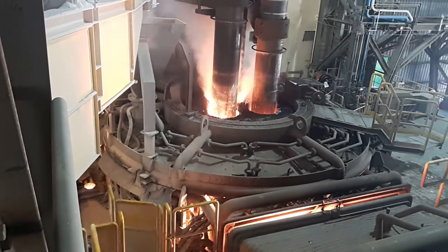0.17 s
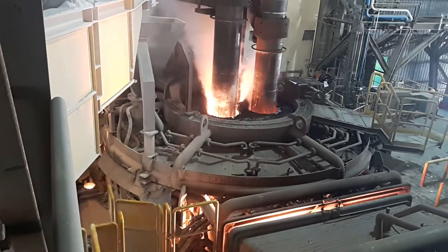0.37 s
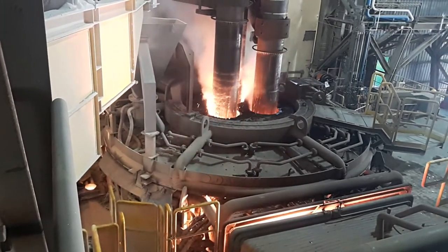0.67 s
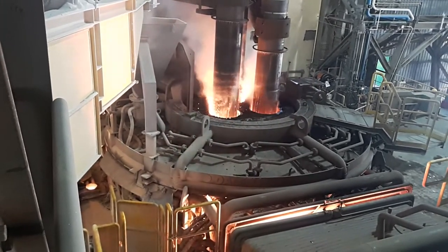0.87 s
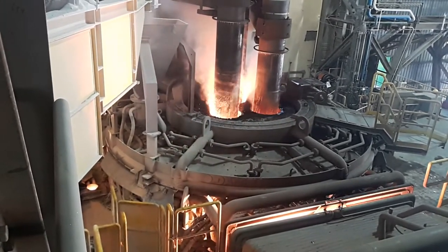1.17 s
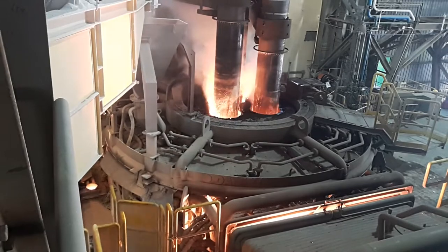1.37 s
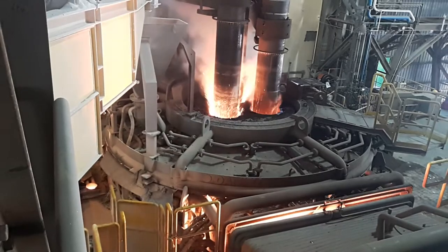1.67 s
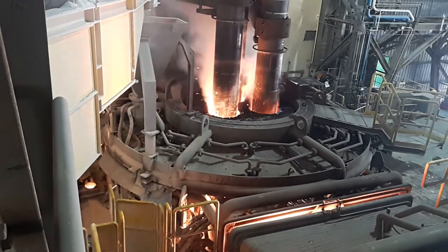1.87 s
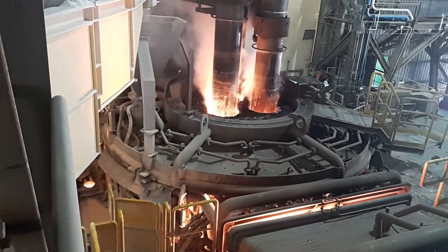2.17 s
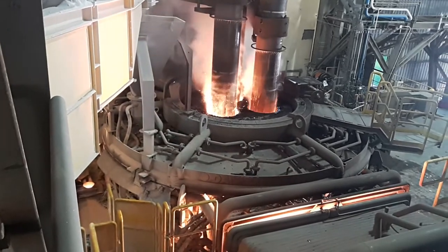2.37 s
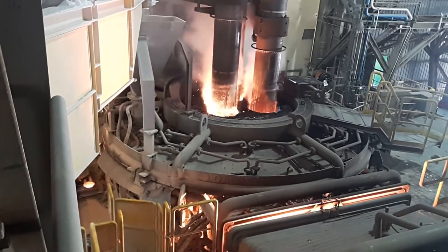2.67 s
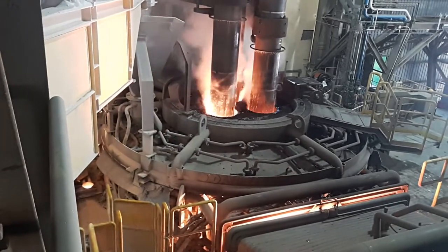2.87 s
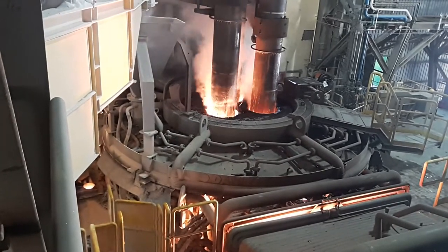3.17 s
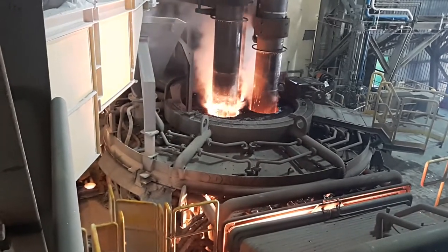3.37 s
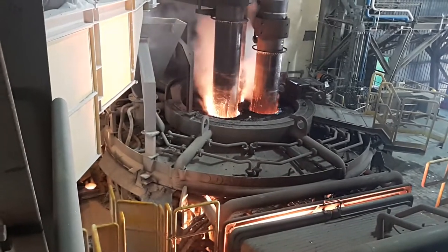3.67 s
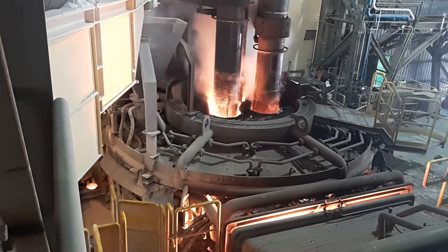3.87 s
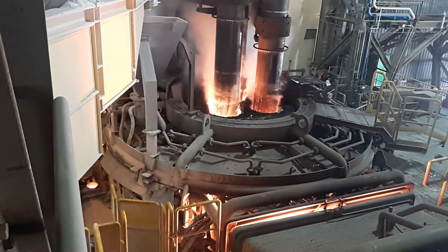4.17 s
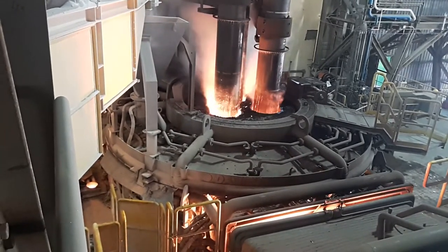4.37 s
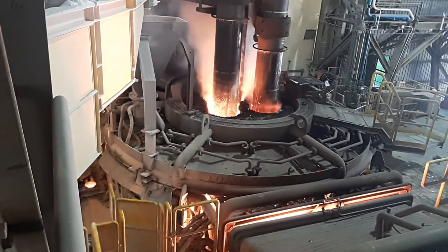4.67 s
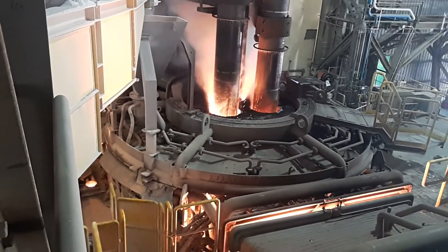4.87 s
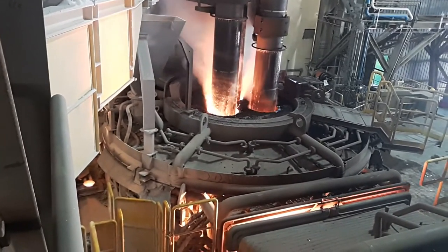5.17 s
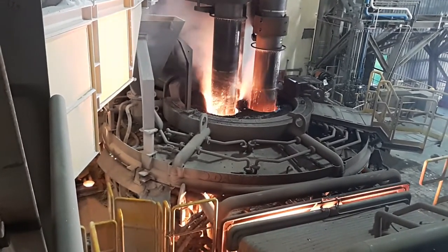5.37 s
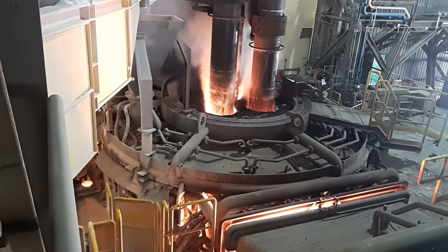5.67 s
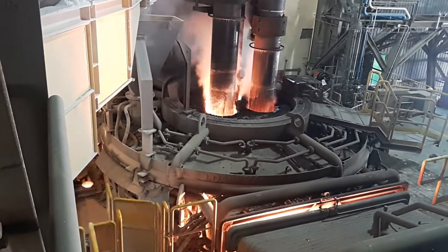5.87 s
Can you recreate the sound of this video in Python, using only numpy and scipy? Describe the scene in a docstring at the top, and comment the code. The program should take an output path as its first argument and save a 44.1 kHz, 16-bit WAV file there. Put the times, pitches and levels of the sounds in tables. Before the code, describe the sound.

An electric arc furnace runs without pause in a large steel plant. Its loud, low hum wavers as the overtones swell and fade, mixed with a rough roar and dense crackling of sparks. Now and then a flare spits at the electrodes or a heavy arc gives a short muffled bark inside the shell. Machinery whines very faintly. The microphone is on a gallery above the furnace roof.

```python
"""An electric arc furnace melts steel in a large plant hall, heard from a gallery above its roof.
The arcs restrike twice per mains cycle: a loud hum whose harmonics swell and fade as the arcs wander.
Uneven puffs add a rough roar, sparks crackle without pause, and plant machinery whines faintly.
Now and then a flare spits at the electrode ports or a heavy strike barks inside the shell."""
import sys
import numpy as np
from scipy import signal
from scipy.fft import rfft, irfft, next_fast_len
from scipy.io import wavfile
from scipy.ndimage import uniform_filter1d, minimum_filter1d, map_coordinates

SR = 44100
rng = np.random.default_rng(int(sys.argv[2]) if len(sys.argv) > 2 else 0)


def materialize(psi):
    """Save the field psi as 16-bit PCM at rate SR to the path in sys.argv[1].

    A 1-D psi becomes a single channel; in a 2-D psi each row is a channel.
    """
    bounded = np.clip(np.atleast_2d(psi).T, -1, 1)
    quanta = np.round(bounded * 32767).astype(np.int16)
    wavfile.write(sys.argv[1], SR, quanta)


N = 264776
TIME_S = np.arange(N) / SR
RESTRIKE_HZ = 99.8


def amp(db):
    """Decibels to gain."""
    return 10 ** (np.asarray(db) / 20)


def unit_rms(x):
    """Scale to rms 1."""
    return x / np.sqrt(np.mean(np.abs(x) ** 2) + 1e-20)


def at_hz(points, hz):
    """Interpolate (freq_hz, value) rows on a log axis."""
    freqs_hz, values = np.transpose(points)
    return np.interp(np.log(hz + 1), np.log(freqs_hz + 1), values)


def curve(points):
    """Interpolate (time_s, value) rows per sample."""
    return np.interp(TIME_S, *np.transpose(points))


def wobble(knots_per_s):
    """Smooth random curve, rms near 1."""
    return map_coordinates(rng.standard_normal(2048), [TIME_S * knots_per_s], mode="wrap")


def filtered(x, response):
    """Apply the gain response(hz)."""
    size = next_fast_len(N + SR // 2)
    return irfft(rfft(x, size) * response(np.fft.rfftfreq(size, 1 / SR)), size)[..., :N]


def pan(db):
    """Stereo gains for a left-over-right level."""
    return amp(np.array([np.atleast_1d(db), -np.atleast_1d(db)]) / 2)


def disturbance(events, half_width_s, full_db):
    """How far events unsettle the arcs, 0 to 1; saturates at full_db."""
    bumps = (amp(db - full_db) ** 2 * np.exp(-((TIME_S - start_s) / half_width_s) ** 2)
             for start_s, db, *_ in events)
    return np.minimum(1, sum(bumps))


# left-right likeness: freq_hz, correlation
COHERENCE = [(30, .85), (100, 0.7), (200, 0.9), (400, 0.3), (650, 0.77), (1000, 0.38), (2000, 0.072),
             (15000, .05)]
# left over right: freq_hz, pan_db
BALANCE = [(60, 12), (200, -4), (330, 1.5), (500, 0), (770, 4), (1170, -1.5), (1800, 5.5), (2800, 3),
           (4200, 3), (6400, 1.5), (9000, -3), (12000, 3)]


def spread(noise_pair, spectrum):
    """Colour two independent noises and blend to stereo: bass alike, treble diffuse."""
    def mid_side_gains(hz):
        angle = np.arccos(at_hz(COHERENCE, hz)) / 2
        return amp(at_hz(spectrum, hz)) * [np.cos(angle), np.sin(angle)]

    mid, side = filtered(noise_pair, mid_side_gains)
    stereo = np.array([mid + side, mid - side]) / np.std(mid)
    return filtered(stereo, lambda hz: pan(at_hz(BALANCE, hz)))


def hall_noise(power, near_t60_s, tail_t60_s=0.4, tail_db=7.5):
    """Noise pair carrying each burst of power: scatter off nearby steel, then the hall's tail."""
    t = np.arange(SR) / SR
    near, tail = amp(-120 * t / near_t60_s), amp(-120 * t / tail_t60_s)
    response = near / near.sum() + amp(2 * tail_db) * tail / tail.sum()
    arriving = signal.fftconvolve(np.pad(power, (SR, 0), mode="wrap"), response)[SR:SR + N]
    return np.sqrt(np.abs(arriving)) * rng.standard_normal((2, N))


# hum harmonics 1 to 4, before trim: time_s, level_db
HARMONIC_1 = [(0.0, -16), (0.56, -17), (0.68, -14.5), (0.76, -17), (1.86, -15.5), (1.92, -20.5),
              (2.14, -13), (2.38, -20.5), (2.5, -14), (2.96, -18.5), (3.08, -12.5), (3.18, -17.5),
              (3.66, -14.5), (3.74, -18.5), (3.9, -14), (5.14, -18.5), (5.28, -14.5), (5.68, -17),
              (5.84, -18.5), (6.0, -19.0)]
HARMONIC_2 = [(0.0, -25), (0.06, -18), (0.56, -29), (0.7, -14.5), (0.78, -26.5), (0.94, -18.5),
              (1.22, -30.5), (1.32, -15), (2.04, -24.5), (2.36, -17), (2.46, -26), (2.52, -16.5),
              (2.84, -14.5), (2.94, -26), (3.04, -19.0), (3.6, -18), (3.68, -32), (4.24, -18),
              (4.62, -27.5), (4.88, -13), (5.12, -27.5), (6.0, -21.5)]
HARMONIC_3 = [(0.0, -18), (0.28, -18.0), (0.34, -27.5), (0.48, -11.5), (0.68, -20.5), (0.86, -15),
              (1.84, -19.0), (1.96, -14.5), (2.42, -18.5), (2.5, -32.5), (2.76, -13), (3.16, -22),
              (3.22, -13.5), (3.46, -23.5), (3.54, -13.5), (3.68, -22.5), (3.82, -13), (3.92, -18.5),
              (4.06, -12.5), (4.28, -17.5), (4.48, -13), (4.88, -19.5), (4.94, -15), (5.32, -18.5),
              (5.38, -28.0), (5.64, -13.0), (5.84, -20), (6.0, -12.5)]
HARMONIC_4 = [(0.0, -24.5), (0.078, -21), (0.14, -27), (0.38, -15), (0.5, -30.5), (0.6, -17), (1.04, -31),
              (1.12, -20.5), (1.4, -32), (1.64, -18), (1.98, -31.5), (2.16, -19.5), (2.3, -34),
              (2.42, -21.5), (3.02, -18.5), (3.18, -24.5), (3.3, -14), (3.5, -27.5), (3.64, -16.5),
              (3.84, -26), (3.92, -20.5), (4.56, -27.5), (4.68, -15.5), (4.92, -25), (5.36, -19),
              (5.58, -21), (5.86, -16.5), (6.0, -26.5)]
# harmonics 1 to 5: multiple, trim_db, swell_db, wander_rad, flutter_share, pan_db
LOW_HARMONICS = [(1, 0.5, 1.5, 0.077, 0.021, 2.1), (2, -0.5, 2, 2.1, 0.45, 0.2),
                 (3, 0, 1.47, .6, 0.22, 5.5), (4, 0.7, 1.5, 0.89, 0.27, 0.5),
                 (5, -1, 3.5, 1.44, 0.34, -1.5)]
# faint, blurred harmonics: multiple, level_db, flutter_per_s
HIGH_HARMONICS = [(6, -33.5, 20), (7, -38.5, 36), (8, -41.5, 30)]


def hum(fifth_db=-28.5, swells_per_s=11):
    """Restrike harmonics drift as the arcs wander; flares sap 2 to 5, blasts pump 2 and 4."""
    def flutter(per_s):
        return unit_rms(wobble(per_s) + 1j * wobble(per_s))

    phase = 2 * np.pi * RESTRIKE_HZ * TIME_S
    sag_db = 4 * disturbance(PORT_FLARES, half_width_s=0.027, full_db=-17.5)
    pump_db = 2 * disturbance(HEAVY_STRIKES, half_width_s=0.034, full_db=-8.5)
    levels_db = [curve(HARMONIC_1),
                 curve(HARMONIC_2) + pump_db - sag_db,
                 curve(HARMONIC_3) - sag_db,
                 curve(HARMONIC_4) + pump_db - sag_db,
                 fifth_db - sag_db]
    out = np.zeros((2, N))
    for level_db, (k, trim_db, swell_db, wander_rad, share, pan_db) in zip(levels_db, LOW_HARMONICS):
        hall_rad = rng.uniform(0, 2 * np.pi)
        tone = np.exp(1j * (k * phase + hall_rad + wander_rad * wobble(4)))
        # the hall adds a little flutter of its own on each side
        waver = 1 + share * (flutter(32) + 0.35 * np.array([flutter(37), flutter(18)]))
        swell = 1 + (amp(swell_db) - 1) * np.tanh(wobble(swells_per_s))
        out += amp(level_db + trim_db) * pan(pan_db) * unit_rms((swell * waver * tone).real)
    for k, level_db, per_s in HIGH_HARMONICS:
        waver = flutter(per_s) + 0.16 * np.array([flutter(per_s), flutter(per_s)])
        out += amp(level_db) * unit_rms((waver * np.exp(1j * k * phase)).real)
    return out


# how hard the arcs blow: time_s, relative_db
ROAR_LEVEL = [(0.0, -26), (0.06, -26.0), (0.74, -29), (1.44, -28), (2.82, -28.5), (3.0, -32), (3.34, -25.5),
              (3.52, -27.5), (4.62, -28.5), (6.0, -29)]
# puffs through the furnace shell: freq_hz, gain_db
ROAR_SPECTRUM = [(20, -28.5), (45, -17), (68, -9), (100, -2.5), (165, 3.5), (250, 1.5), (350, 2), (550, -1),
                 (740, -7.5), (980, -5), (1300, -16), (1700, -19), (4000, -47), (10000, -96)]


def roar(gain_db=7.5, surge_db=1, surges_per_s=16, scatter_db=0.5, jitter_rad=2.1):
    """Each restrike blows one ragged puff of its own strength and timing into the shell."""
    level_db = curve(ROAR_LEVEL) + gain_db + surge_db * wobble(surges_per_s)
    phase = 2 * np.pi * RESTRIKE_HZ * TIME_S + jitter_rad * wobble(45)
    puffs = np.exp(np.cos(phase)) * amp(scatter_db * wobble(RESTRIKE_HZ))
    return amp(level_db) * spread(hall_noise(puffs ** 2, near_t60_s=0.008), ROAR_SPECTRUM)


# spark activity: time_s, relative_db
SPARK_LEVEL = [(0.04, -35), (0.3, -36.5), (2.38, -35), (2.77, -35), (3.34, -34.5), (3.87, -36.5),
               (4.27, -35), (4.85, -37), (5.4, -35), (5.8, -35)]
# spark colour: freq_hz, gain_db
SPARK_SPECTRUM = [(700, -25.5), (1200, -4), (1700, -9.5), (2600, -9), (3500, -14.5), (4700, -16),
                  (6000, -22.5), (7500, -23), (8500, -20.5), (9300, -23.5), (10300, -31.5), (13500, -36.5),
                  (15500, -34.5)]


def crackle(sparks_per_s=900, scatter_db=4.5, split_hz=4500, coarse_db=2, fine_db=1.03):
    """Dense sparks of uneven size, smeared by the hall; the finest fizz independently."""
    def shower():
        sizes = amp(scatter_db * np.clip(rng.standard_normal(N), -2.5, 2.5))
        sparks = sizes * (rng.random(N) < sparks_per_s / SR)
        return spread(hall_noise(sparks ** 2, near_t60_s=0.043), SPARK_SPECTRUM)

    def low_share(hz):
        return 1 / (1 + (hz / split_hz) ** 6)

    coarse = filtered(shower(), lambda hz: np.sqrt(low_share(hz)))
    fine = filtered(shower(), lambda hz: np.sqrt(1 - low_share(hz)))
    return amp(curve(SPARK_LEVEL)) * (amp(coarse_db) * coarse + amp(fine_db) * fine)


def whine(pitch_hz=5254, level_db=-63):
    """Thin, slightly wavering tone from the plant's machinery."""
    gain = amp(level_db + 2 * wobble(5))
    return gain * unit_rms(np.sin(2 * np.pi * pitch_hz * TIME_S + 0.6 * wobble(11)))


# flares at the electrode ports: start_s, relative_db, tilt_db_per_octave
PORT_FLARES = [(.059, -27.5, 7.5), (.34, -22.5, 0), (.555, -23.5, 0), (1.604, -16, -7), (1.914, -24, 5.5),
               (1.927, -20.5, 3), (1.976, -25, 1), (2.007, -19.5, -2.5), (2.068, -25, 2.5), (2.229, -25, 1),
               (2.419, -22, -5), (2.499, -24, 3), (2.677, -16.5, -5), (2.895, -21, -3.5),
               (3.38, -18.5, -4.5), (4.146, -17.5, -5.5), (4.214, -25, -3), (4.858, -16.5, -6),
               (5.23, -20, 0.5), (5.37, -28, 0), (5.517, -21.5, 3), (5.532, -15, -3.5), (5.551, -18.5, -8),
               (5.868, -14, -2), (5.883, -17, -8.5), (5.903, -12.5, -8)]
# spit before tilt: freq_hz, gain_db
FLARE_SPECTRUM = [(700, -29), (1500, -3.5), (2500, 4), (4500, 0), (6500, -5), (8800, -4.5), (10500, -20),
                  (15500, -29)]


def flares(gain_db=-10.5, pan_db=2.5, rise_s=0.0012, t60_s=0.22, tail_db=-13, tail_t60_s=0.67):
    """A flare bursts through a port: a sputtering spit, trailed briefly by the hall."""
    t = np.arange(SR // 2) / SR
    hz = np.fft.rfftfreq(len(t), 1 / SR)
    octaves = np.log2(np.maximum(hz, 1000) / 4000)
    sputter = amp(2 * wobble(450))
    attack = 1 - np.exp(-t / rise_s)
    decay = np.hypot(amp(-60 * t / t60_s), amp(tail_db - 60 * t / tail_t60_s))
    out = np.zeros((2, N + SR))
    for start_s, db, tilt in PORT_FLARES:
        colour = amp(at_hz(FLARE_SPECTRUM, hz) + tilt * octaves)
        hiss = unit_rms(irfft(rfft(rng.standard_normal((2, len(t)))) * colour, len(t)))
        start = round(start_s * SR)
        out[:, start:start + len(t)] += amp(db + gain_db) * attack * decay * hiss
    return pan(pan_db) * sputter * out[:, :N]


# blasts inside the shell: start_s, relative_db
HEAVY_STRIKES = [(0.093, -14.5), (1.647, -12.5), (1.67, -20), (3.316, -13.5), (3.346, -5), (4.295, -11.5),
                 (4.75, -12), (5.682, -14.5), (5.899, -11)]
# muffled bark: freq_hz, gain_db
BLAST_SPECTRUM = [(100, -55), (250, -28), (550, 3.5), (1000, 1.5), (1700, -9), (4000, -24), (10000, -81)]


def blasts(gain_db=-8.5, t60_s=0.045):
    """An arc strikes heavily: a short bark, muffled by the shell."""
    envelope = np.zeros(N)
    for start_s, db in HEAVY_STRIKES:
        after = TIME_S >= start_s
        envelope[after] += amp(db + gain_db - 60 * (TIME_S[after] - start_s) / t60_s)
    rms = np.sqrt(np.mean(envelope ** 2))
    return rms * spread(envelope * rng.standard_normal((2, N)), BLAST_SPECTRUM)


def scene():
    """Continuous furnace and plant noise, plus flares and blasts."""
    return hum() + roar() + crackle() + whine() + flares() + blasts()


def record(dry):
    """Peak limiter, then a 15.8 kHz low-pass."""
    ceiling, window_samples = 0.92, 601
    needed = np.minimum(1, ceiling / (np.abs(dry).max(axis=0) + 1e-9))
    gain = uniform_filter1d(minimum_filter1d(needed, window_samples), window_samples)
    return filtered(dry * gain, lambda hz: hz < 15800)


dry = scene()
out = record(dry)
materialize(out)
```